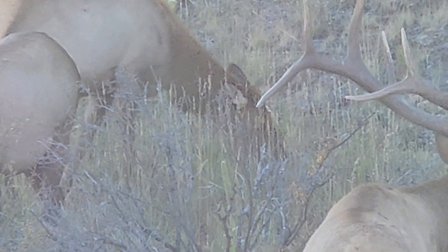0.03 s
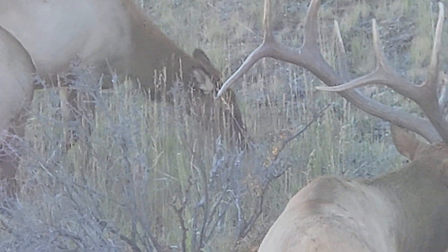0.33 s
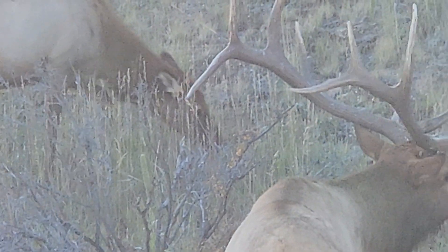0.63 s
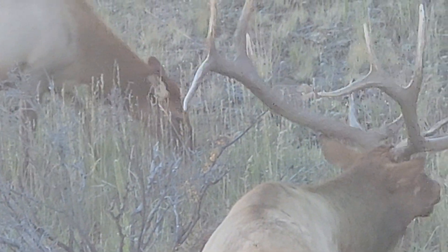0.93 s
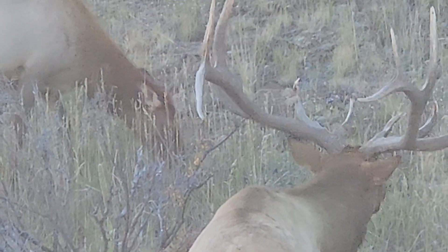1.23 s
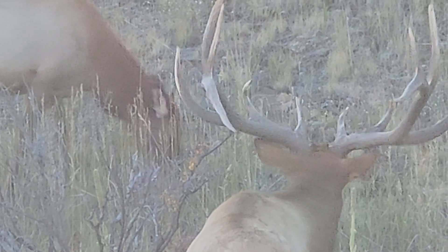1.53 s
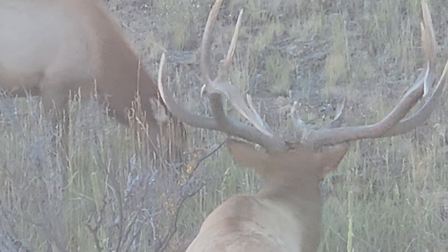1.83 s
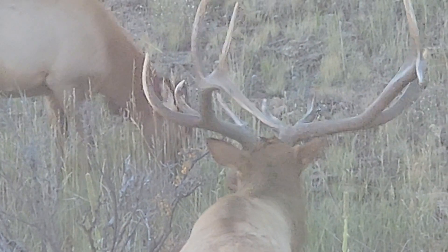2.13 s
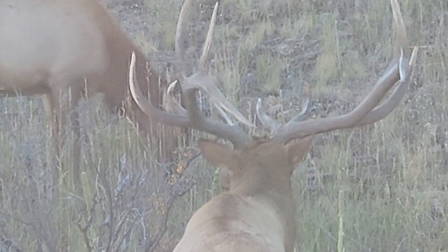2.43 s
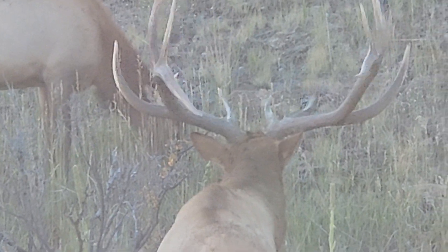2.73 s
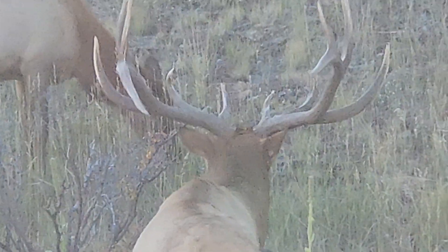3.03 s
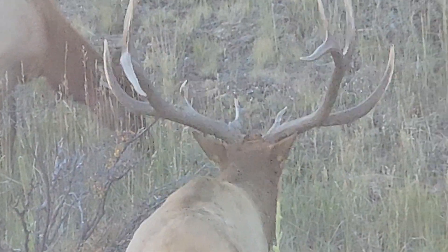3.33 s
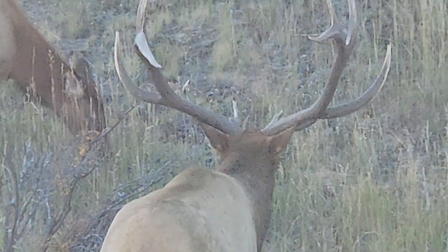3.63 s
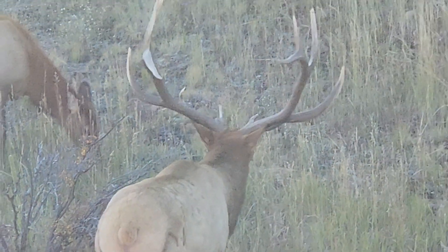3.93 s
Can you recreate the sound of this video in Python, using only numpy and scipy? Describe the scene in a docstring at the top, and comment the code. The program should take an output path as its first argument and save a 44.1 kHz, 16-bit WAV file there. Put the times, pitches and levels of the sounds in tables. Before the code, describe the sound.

A bull elk bugles close by in open grassland, a harsh scream clearing to a whistle and falling into a grunt. Wind rumbles throughout, with soft microphone thumps, faint snapping stems and a late gust.

```python
"""A harsh scream opens a bull elk's bugle, close by in open grassland: a whistle shaken by the irregular
roar of the vocal folds. It clears to a pure tone, breaks, then falls through the throat's resonances
into a grunt. The hillside returns a faint echo; wind rumbles throughout. There are soft low thumps on
the microphone, dry stems rustle and snap, and a late gust rises in the grass."""
import sys
import numpy as np
from scipy import signal
from scipy.fft import rfft, irfft
from scipy.io import wavfile
from scipy.ndimage import uniform_filter1d, minimum_filter1d

SR = 44100
rng = np.random.default_rng(int(sys.argv[2]) if len(sys.argv) > 2 else 0)


def store_pcm(level_fs):
    """Save levels as 16-bit WAV."""
    pcm = np.round(np.clip(level_fs, -1, 1) * 32767).astype(np.int16)
    wavfile.write(sys.argv[1], SR, np.atleast_2d(pcm).T)


N = 176400
T = np.arange(N) / SR
F = np.maximum(np.fft.rfftfreq(N, 1 / SR), 1)

# Vocal fold effort. Each row: time in seconds, roar level in dB, whistle roughness (capped at 1 in use).
FOLD_EFFORT = [(0, -12.5, 1), (.68, -12.5, 1), (.735, -21, 0.42), (.775, -22.5, 0.22), (.81, -41.5, 0.08),
               (.9, -49, 0.14), (.94, -26.5, .4), (.968, -15, 0.31), (1.1, -24.5, 0.4), (1.18, -25.5, 1.1),
               (1.21, -41, 0.7), (1.33, -71.5, .8)]


def undb(db):
    """Decibels to gain."""
    return 10 ** (np.asarray(db) / 20)


def unit(x):
    """Scale to rms 1."""
    return x / np.std(x)


def over_time(rows, column=1):
    """One table column, interpolated in time."""
    rows = np.array(rows)
    return np.interp(T, rows[:, 0], rows[:, column])


def over_hz(rows):
    """Rows of (Hz, value), interpolated in log frequency."""
    hz, value = np.array(rows).T
    return np.interp(np.log(F), np.log(hz), value)


def noise(spectrum):
    """Noise of rms 1, shaped by rows of (Hz, relative dB)."""
    return unit(irfft(rfft(rng.standard_normal(N)) * undb(over_hz(spectrum)), N))


def below(x, hz):
    """Zero-phase low-pass."""
    return irfft(rfft(x) / (1 + (F / hz) ** 4), N)


def wobble(rate_hz):
    """Random motion of rms 1, up to about rate_hz."""
    return unit(below(rng.standard_normal(N), rate_hz))


def resonate(x, hz, width_hz):
    """One resonance, applied twice."""
    b, a = signal.iirpeak(hz, hz / width_hz, fs=SR)
    return signal.lfilter(b, a, signal.lfilter(b, a, x + 1e-18))


def vocal_folds(pitch_hz=136.3, jitter=0.13, scatter_db=7, puff_gain=1.9):
    """Irregular pulses, each followed by a puff of air; also returns their fundamental."""
    cycles = np.cumsum(pitch_hz * np.exp(jitter * wobble(pitch_hz))) / SR
    pulses = np.diff(np.floor(cycles), prepend=0) * undb(scatter_db * wobble(pitch_hz))
    puffs = np.exp(-(cycles % 1) / 1.4) * rng.standard_normal(N)
    return unit(unit(pulses) + puff_gain * unit(puffs)), unit(np.cos(2 * np.pi * cycles))


def voice_break(peak_s=0.94, half_length_s=0.026):
    """Envelope, 0-1, of the moment the pure tone breaks."""
    return np.exp(-((T - peak_s) / half_length_s) ** 2)


def whistle(flap, wander_hz=70.13, shake_rad=0.73, chop_depth=0.5):
    """High tone and its overtones, chopped by the flapping folds; splits to half pitch at the break."""
    # Whistle contour. Each row: time in seconds, pitch in Hz, level in dB.
    contour = [(0, 2206, -10), (.69, 2227, -9), (.722, 2283, -6), (.85, 2261, -7.5), (.912, 2245, -7),
               (.94, 2180, -6), (.962, 2030, -5.5), (.995, 1754, -33.5), (1.025, 1440, -16.5),
               (1.065, 1363, -19.5), (1.095, 1120, -24), (1.15, 1030, -30), (1.21, 720, -44)]
    # Overtones. Each row: multiple of the pitch, relative level in dB at zero roughness.
    harmonics = [(2, -21), (3, -34.5), (4, -44.5), (5, -65.5)]
    rough = np.clip(over_time(FOLD_EFFORT, column=2), 0, 1)
    breaking = voice_break()
    pitch_hz = over_time(contour) + wander_hz * rough ** 2 * wobble(150.1) + 2 * wobble(49)
    phase = 2 * np.pi * np.cumsum(pitch_hz) / SR + shake_rad * rough ** 2 * wobble(198)
    flutter_db = (1.56 + 2 * breaking) * wobble(66)
    chop = 1 + chop_depth * rough * flap
    level = np.sqrt(2) * undb(over_time(contour, column=2) + flutter_db) * chop * (T < contour[-1][0])
    split = undb(-15.5) * breaking * np.cos(phase / 2)
    tone = level * (1 + split) * np.sin(phase)
    overtones = sum(undb(db) * np.sin(round(multiple) * phase) for multiple, db in harmonics)
    squeal = undb(-30.5) * breaking * (np.sin(1.5 * phase) + np.sin(2.5 * phase))
    fade = np.clip((0.972 - T) / 0.04, 0, 1)  # overtones die at the break
    return tone, level * undb(-20 * rough) * fade * (overtones + squeal)


def throat_gain(sag_hz):
    """Throat response: steep peaks, lowered by sag_hz, over dark valleys."""
    # Throat resonances. Each row: centre in Hz, width in Hz, peak gain in dB.
    formants = [(748, 136, -17.5), (1146, 146, -1.5), (1439, 78, 6.5), (1845, 595, -7.5), (2013, 280, 3),
                (2253, 60, -1), (2484, 292, -2), (2840, 177, -5.5), (3113, 184, -17), (3506, 98, -26.5),
                (4080, 1000, -24.5), (4693, 79, -20), (5235, 650, -29.5), (7660, 2000, -54.5)]
    valleys = undb(-43) / (1 + (F / 5000) ** 4)
    return valleys + sum(undb(db) / (1 + 2 * ((F - hz + sag_hz) / width_hz) ** 2) ** 3
                         for hz, width_hz, db in formants)


def throat(x, relax_s=0.9, relax_length_s=0.2, sag_hz=39.5, tilt_db_per_octave=-28, stages=5):
    """Tense in the scream, the throat then lengthens unsteadily: its resonances sag and darken."""
    relax = np.clip((T - relax_s) / relax_length_s, 0, 1)
    relax = np.clip(relax * (1 + 0.39 * wobble(14)), 0, 1)
    tilt_db = tilt_db_per_octave * np.clip(np.log2(F / 1270), -0.8, 0.17)
    spectrum = 0
    for stage in np.linspace(0, 1, stages):  # crossfade from tense to relaxed
        share = np.maximum(1 - np.abs(relax - stage) * (stages - 1), 0)
        response = throat_gain(sag_hz * stage ** 2) * undb(tilt_db * np.sqrt(stage))
        spectrum = spectrum + rfft(x * share) * response
    return irfft(spectrum, N) * (T < 2)


def rasp(pulses, effort):
    """Airy hiss that follows the roar pulse by pulse and spurts at the break."""
    level = undb(-65) * (effort / effort.max()) ** 0.22 + undb(-58) * voice_break()
    return level * unit(resonate(pulses, hz=8800, width_hz=22000)) * (T < FOLD_EFFORT[-1][0])


def bugle():
    """Whistle and roar pass through the throat; the chest hums along and ends with a grunt."""
    pulses, fundamental = vocal_folds()
    tone, overtones = whistle(fundamental)
    effort = undb(over_time(FOLD_EFFORT))
    roar = pulses * effort / np.sqrt(np.mean(throat_gain(0) ** 2))  # offsets the tense throat's loss
    chest_hum = undb(-38.5) * fundamental * effort / effort.max()
    return throat(tone + roar) + overtones + rasp(pulses, effort) + chest_hum + grunt(pulses)


def microphone_ports(x):
    """The call reaches the two ports with a lag and a different colour."""
    # Phase between ports. Each row: frequency in Hz, lead of the left in radians.
    lead_rad = [(20, 0), (300, .3), (800, 1.1), (1150, 1.7), (1430, 2.1), (1800, 2.8), (2040, 3.62),
                (2260, 3.85), (2450, 4.4), (3200, 4.5), (4000, 8.5), (4600, 10.8), (5300, 8.4),
                (7000, 10.3), (16000, 22)]
    # Balance between ports. Each row: frequency in Hz, left minus right in dB.
    balance_db = [(700, -2), (2250, 1.5), (2850, 8), (3550, 13), (4050, -1.5), (4500, -8), (4720, -12.5),
                  (5300, -12.5), (6200, 4)]
    left = undb(over_hz(balance_db) / 2) * np.exp(0.5j * over_hz(lead_rad))
    impulses = irfft(np.array([left, 1 / left]), N)
    taps = np.roll(impulses, 256, axis=1)[:, :513] * np.hanning(513)
    return signal.fftconvolve(np.array([x, x]), taps, mode="same", axes=1)


def hillside_echo(x, level_db=-24, t60_s=2.05, top_hz=3500):
    """Long, faint, dull echo, different at each port."""
    tail = rng.standard_normal((2, N)) * 1000 ** (-T / t60_s)
    tail = tail / np.sqrt(np.sum(tail[0] ** 2))
    dull = signal.sosfilt(signal.butter(2, top_hz, fs=SR, output="sos"), x)
    return undb(level_db) * signal.fftconvolve(dull[None], tail, axes=1)[:, :N]


def wind(buffet_db=5.5):
    """Steady distant air with a buffeting rumble."""
    # Air common to both ports. Each row: frequency in Hz, relative density in dB.
    mid_spectrum = [(20, -4.5), (40, -2), (55, -5), (80, 1.5), (110, -10.5), (200, -11.5), (490, -27.5),
                    (850, -25), (1200, -33), (1750, -36.5), (2300, -36), (3500, -58), (5500, -65),
                    (16000, -68)]
    # Air in opposite phase at the ports. Each row: frequency in Hz, relative density in dB.
    side_spectrum = [(20, -3), (200, -11), (500, -17), (850, -11.5), (1400, -10.5), (2400, -24.5),
                     (4500, -47), (16000, -54)]
    air = undb(-33.5) * noise(mid_spectrum)
    buffet = undb(buffet_db * np.clip(wobble(14.3), -1, 1))
    mid = air + below(air, hz=200) * (buffet - 1)
    side = undb(-46) * noise(side_spectrum)
    return np.array([mid + side, mid - side])


def low_thumps():
    """Soft low thumps on the microphone, the first a buffet of wind."""
    # Each row: centre in seconds, pitch in Hz, rise and decay time in seconds, level in dB.
    thumps = [(0.975, 78.8, .025, -21), (1.392, 194.6, 0.014, -22.5), (2.317, 68, 0.0066, -20)]
    return sum(undb(db) * np.exp(-np.abs(T - at_s) / decay_s) * np.sin(2 * np.pi * hz * (at_s - T))
               for at_s, hz, decay_s, db in thumps)


def grunt(pulses, peak_s=1.157, half_length_s=0.064, level_db=-30.5):
    """Fold pulses ring the chest as the call ends."""
    swell = np.exp(-((T - peak_s) / half_length_s) ** 2)
    return undb(level_db) * swell * unit(resonate(pulses, hz=190, width_hz=170))


def rustle(crackle_db=5.1):
    """Dry grass crackles in short swells."""
    # Each row: peak time in seconds, half length in seconds, level in dB.
    swells = [(1.723, 0.08, -52), (2.74, .04, -60), (3.166, 0.076, -59)]
    # Dry grass colour. Each row: frequency in Hz, relative density in dB.
    spectrum = [(2000, 4.5), (4500, -9), (15000, -15.5)]
    level = sum(undb(db) * np.exp(-((T - peak_s) / half_s) ** 2) for peak_s, half_s, db in swells)
    return level * unit(noise(spectrum) * undb(crackle_db * wobble(250)))


def stem_snaps(crack_decay_s=0.0011):
    """Dry stems snap singly: a bright crack and a brief woody knock."""
    # Each row: start in seconds, crack level in dB, knock level in dB.
    snaps = [(1.669, -42, -41.5), (1.807, -51, -42), (2.5629, -40, -29), (2.721, -45, -42),
             (3.161, -53, -62), (3.594, -45, -65)]
    # Stem modes. Each row: frequency in Hz, rise in seconds, relative level in dB.
    stem_modes = [(1580, 0.0011, -5.5), (2730, 0.00039, -0.5)]
    out = np.zeros(N)
    for start_s, crack_db, knock_db in snaps:
        age_s = np.maximum(T - start_s, 0)
        out += undb(crack_db) * rng.standard_normal(N) * (T >= start_s) * np.exp(-age_s / crack_decay_s)
        for hz, rise_s, db in stem_modes:
            envelope = age_s / rise_s * np.exp(1 - age_s / rise_s)
            out += undb(knock_db + db) * envelope * np.sin(2 * np.pi * hz * age_s)
    return out


def gust(flutter_db=1.8):
    """Wind rises in the grass near the end."""
    # Blown grass colour. Each row: frequency in Hz, relative density in dB.
    spectrum = [(100, -18), (280, 6), (480, -12), (950, -3), (1600, -19.5), (2200, -13.5), (3000, -29),
                (4200, -17.5), (5800, -37), (16000, -51)]
    # Gust strength. Each row: time in seconds, level in dB.
    rise_db = [(2.5, -70), (3.1, -54), (3.5, -42.5), (3.95, -36.5)]
    return noise(spectrum) * undb(over_time(rise_db) + flutter_db * wobble(20))


def scene():
    """The elk and its echo in windy grassland, in stereo."""
    call = bugle() * np.minimum(T / 0.004, 1)
    elk = microphone_ports(call) + hillside_echo(call)
    air = wind() + np.array([gust(), gust()])
    stems = np.array([rustle() + stem_snaps() for _ in range(2)])
    return elk + air + low_thumps() + stems


def record(dry, top_hz=15900):
    """The camera limits peaks to full scale, then cuts the top."""
    gain = 1 / np.maximum(np.abs(dry).max(axis=0), 1)
    gain = uniform_filter1d(minimum_filter1d(gain, size=200), size=200)
    return signal.sosfilt(signal.ellip(8, 0.2, 70, top_hz, fs=SR, output="sos"), dry * gain)


dry = scene()
out = record(dry)
store_pcm(out)
```